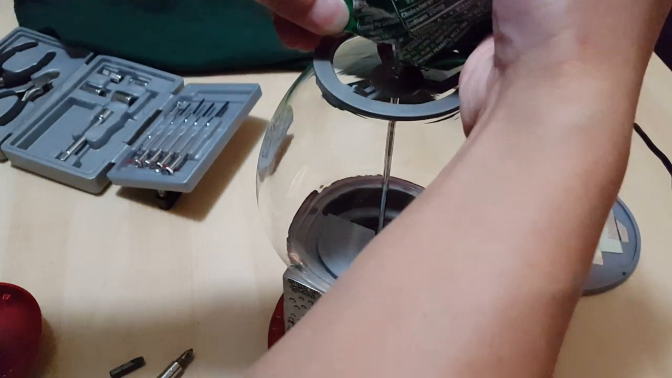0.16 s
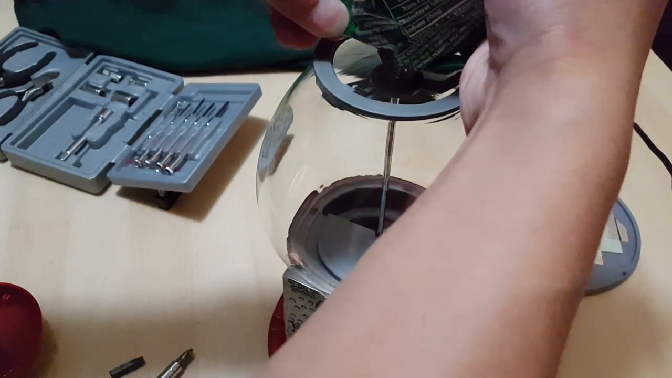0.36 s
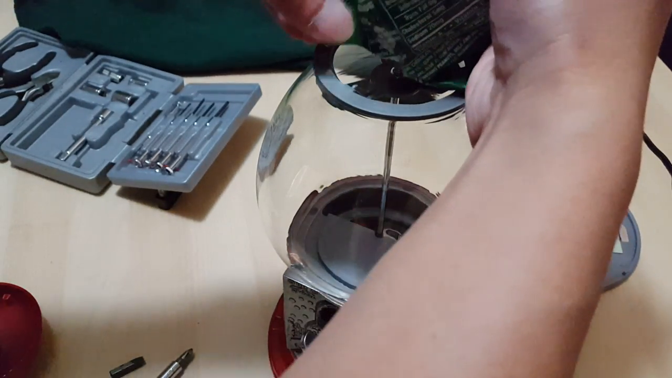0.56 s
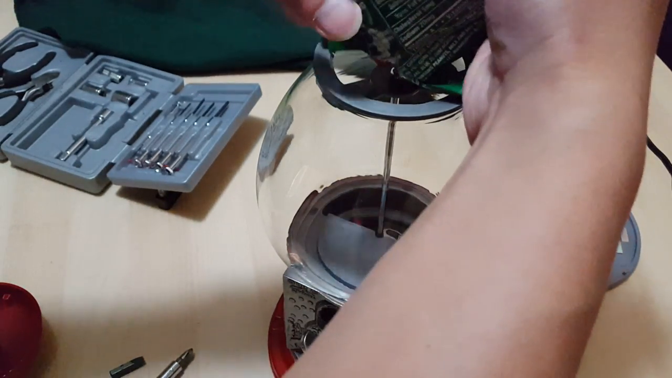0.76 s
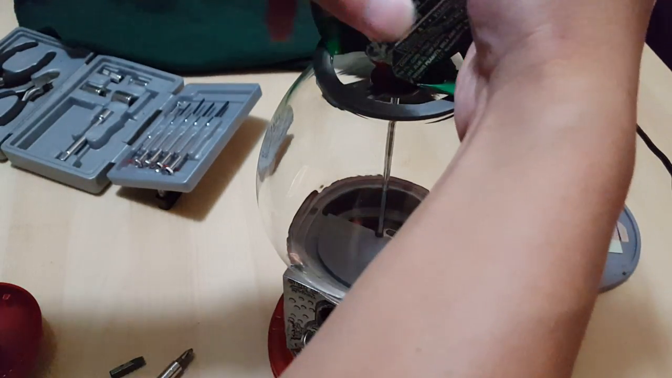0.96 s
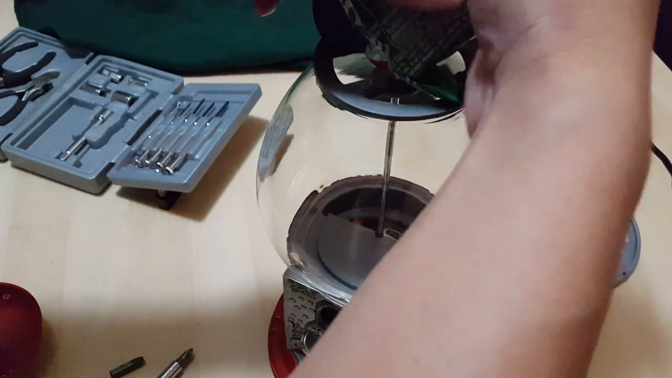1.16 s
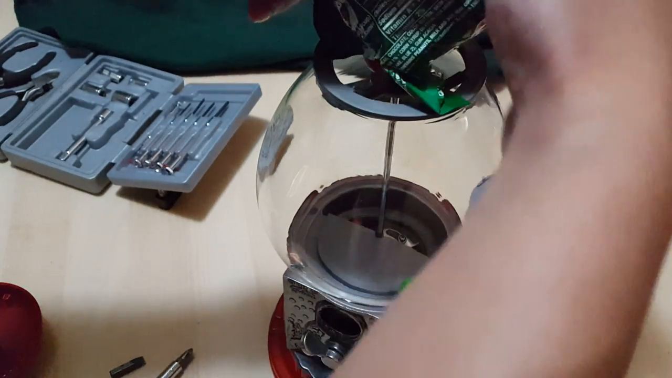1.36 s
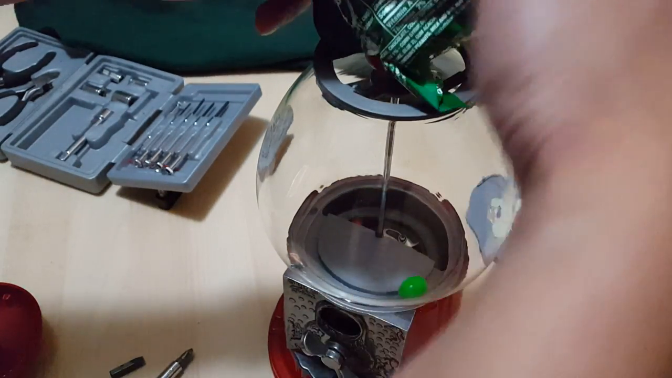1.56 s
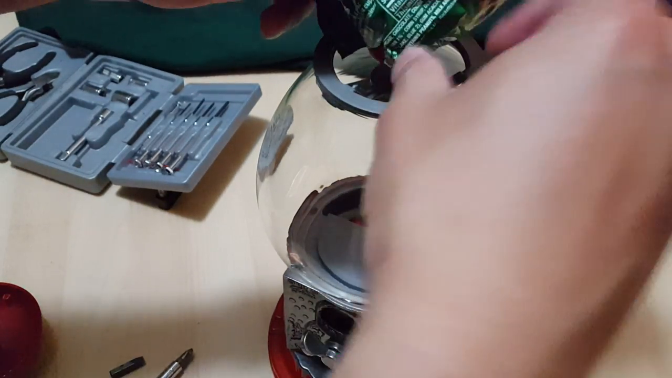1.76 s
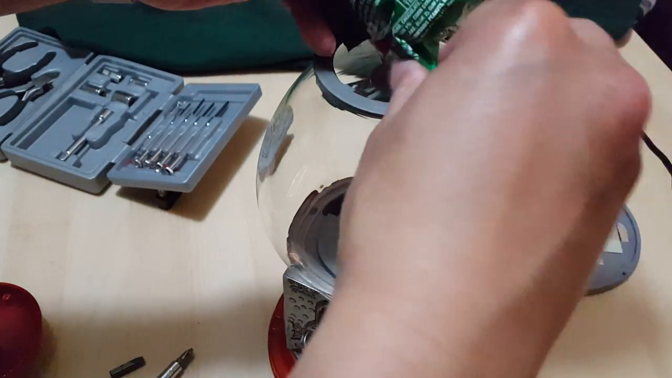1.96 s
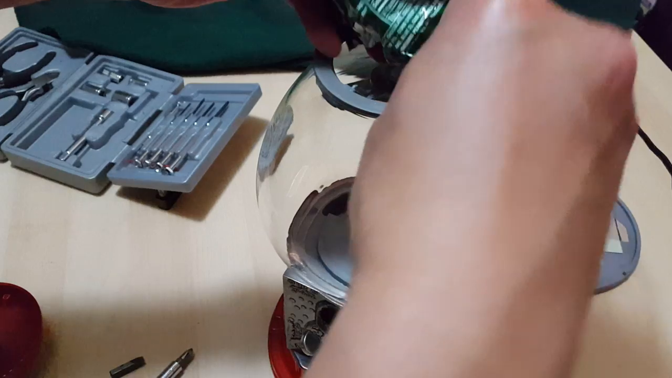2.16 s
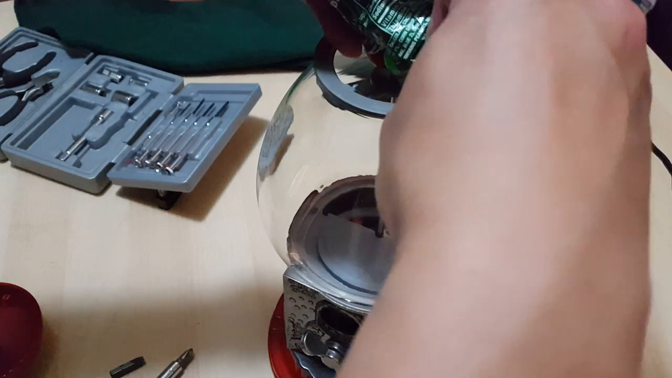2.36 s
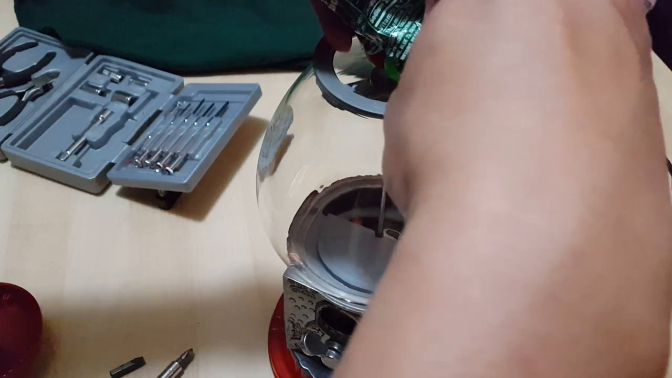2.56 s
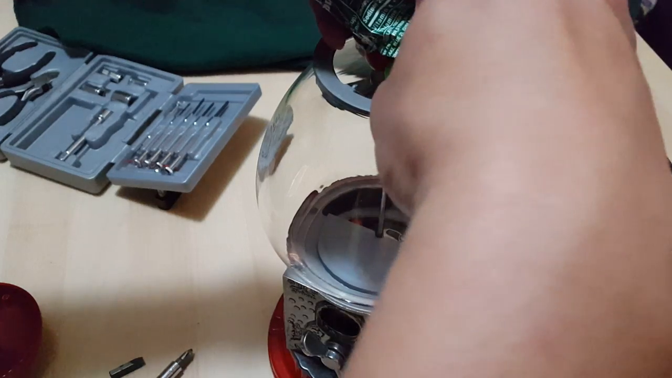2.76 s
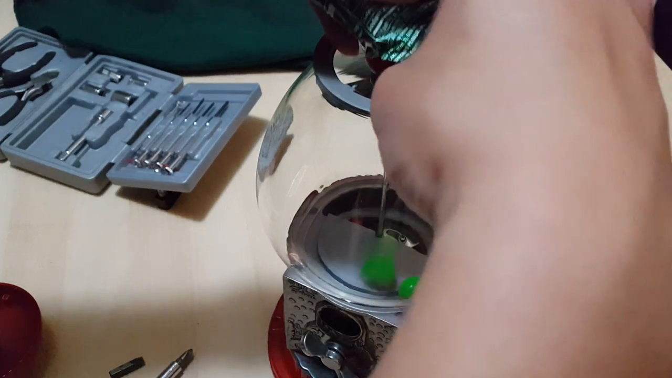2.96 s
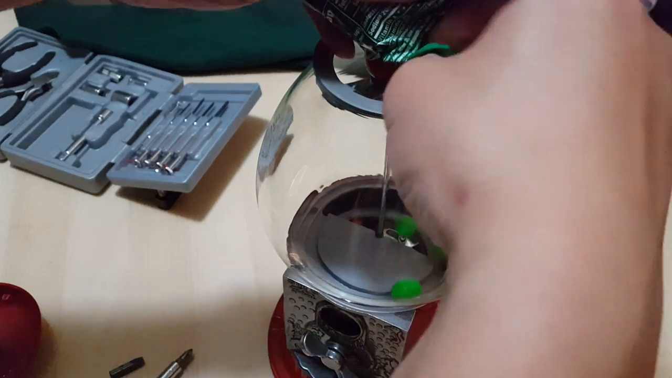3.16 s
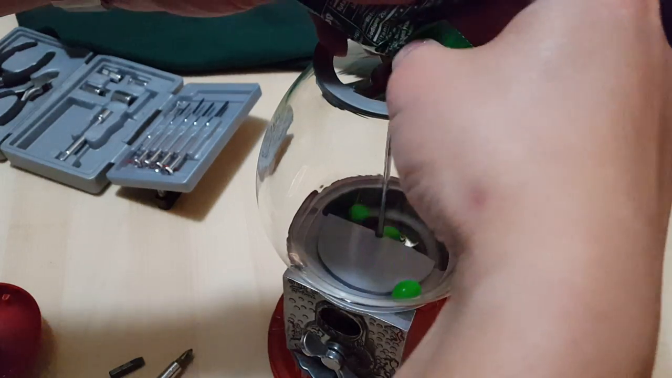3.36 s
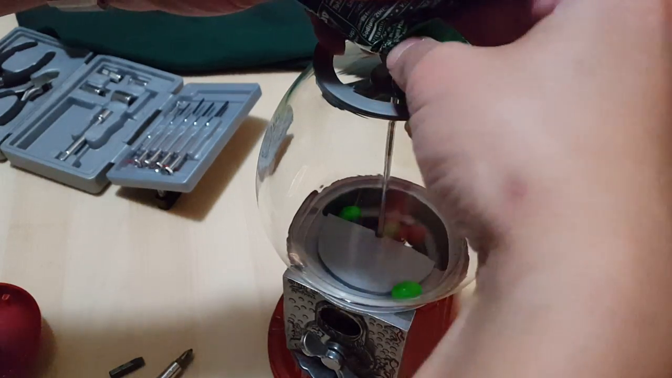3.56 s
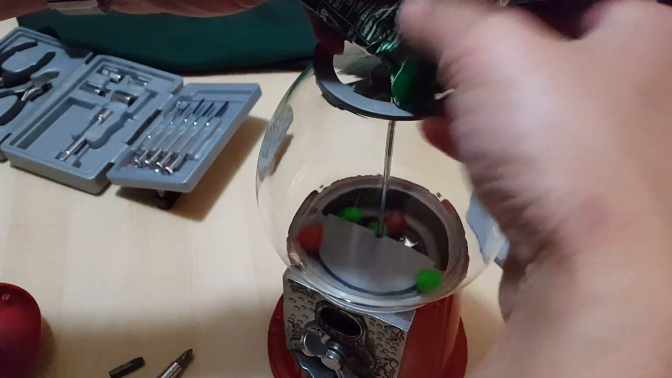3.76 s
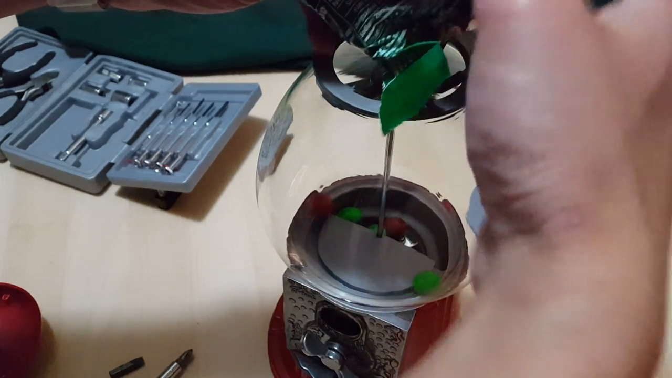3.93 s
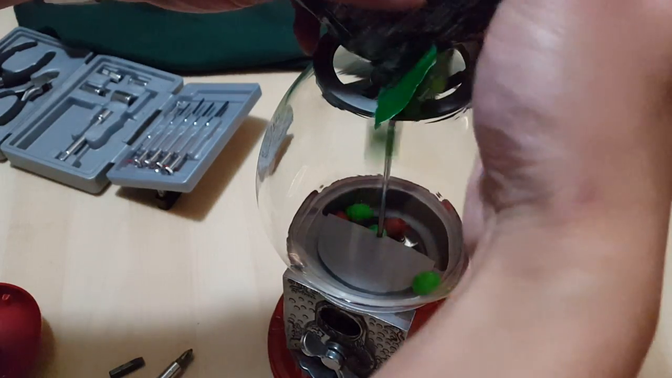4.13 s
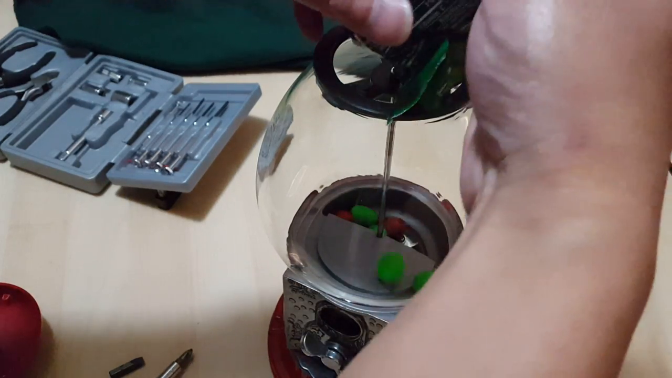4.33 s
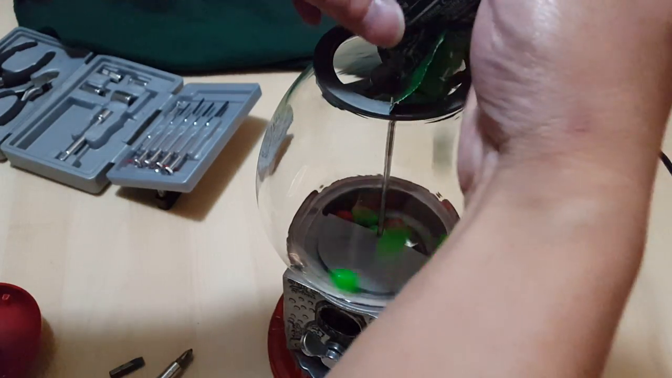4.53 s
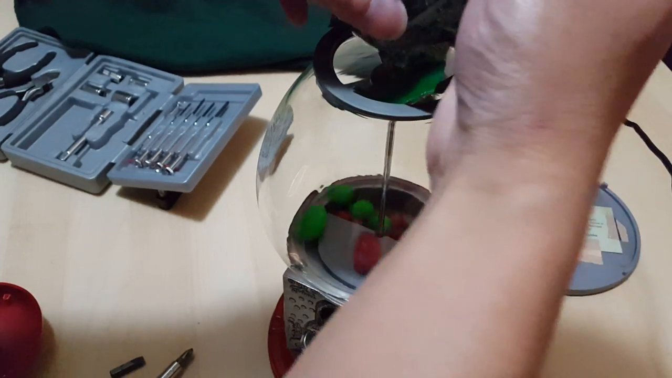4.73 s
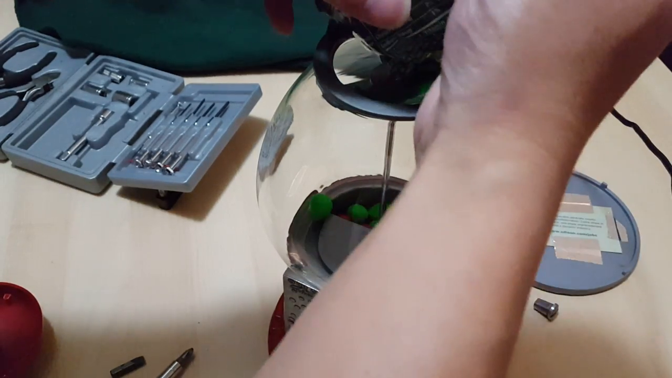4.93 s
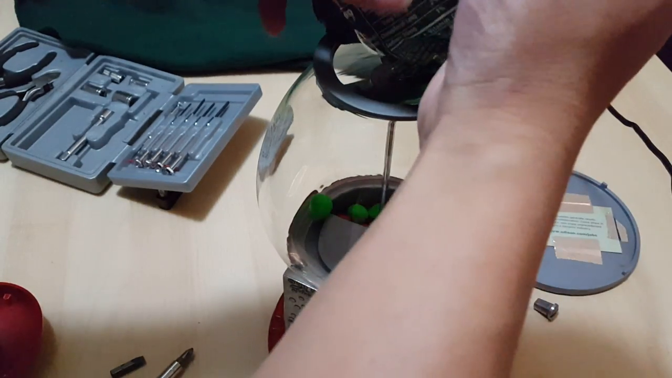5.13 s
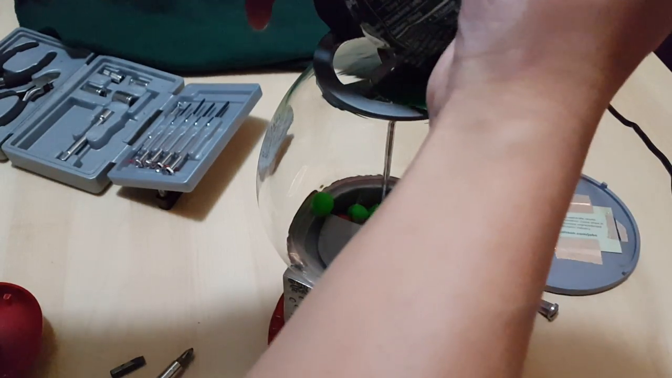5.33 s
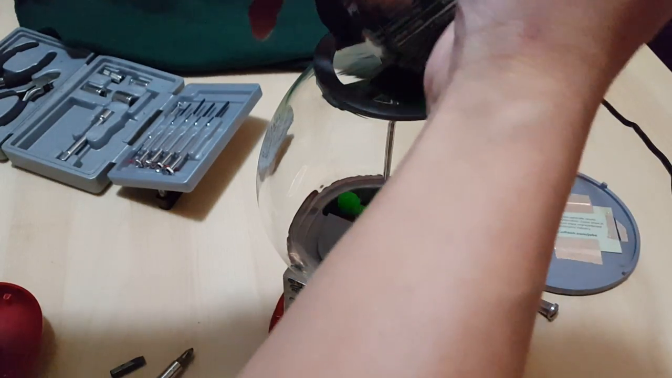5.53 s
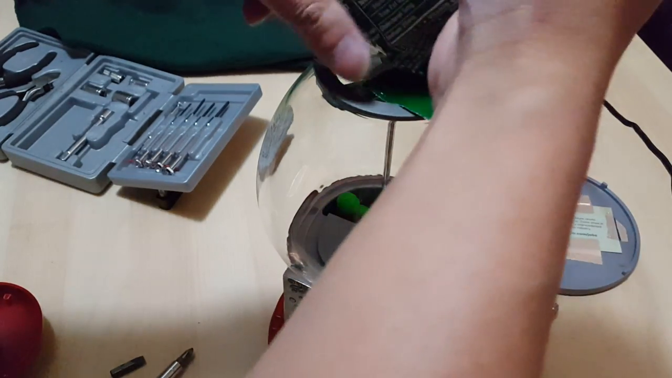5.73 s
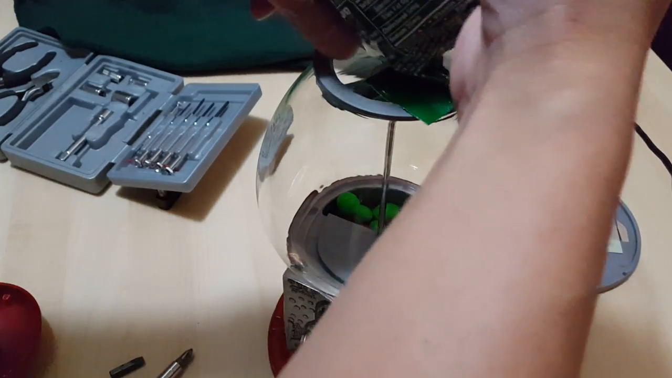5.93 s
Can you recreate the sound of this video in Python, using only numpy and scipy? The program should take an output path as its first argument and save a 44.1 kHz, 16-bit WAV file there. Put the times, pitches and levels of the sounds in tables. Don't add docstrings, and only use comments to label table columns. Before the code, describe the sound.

At a table indoors, heard from very near, thin plastic film rustles and pops in irregular bursts. A handful of hard candies hits a metal base under a hollow glass globe early on; after a long stretch of bag handling, more tumble in, clattering sharply with short glassy rings and tiny rolls. Final crisp crumpling is mixed with low knocks and faint rumble.

```python
import sys
import numpy as np
from scipy import signal
from scipy.fft import next_fast_len
from scipy.io import wavfile
from scipy.ndimage import uniform_filter1d

SR = 44100
rng = np.random.default_rng(int(sys.argv[2]) if len(sys.argv) > 2 else 0)


def natural_amplitude(level_db):
    exponent = np.asarray(level_db, float) / 20
    return 10 ** exponent


def materialize(psi):
    bounded = np.clip(np.atleast_2d(psi).T, -1, 1)
    quanta = np.round(bounded * 32767).astype(np.int16)
    wavfile.write(sys.argv[1], SR, quanta)


N = 268569

SIDES = np.array([[.5], [-.5]])
BANDS_HZ = 36 * 2 ** np.arange(0, 8.9, .5)
UNEVEN_DB, LEAD_SPREAD_RAD = 3, 1.3
SNAP_T60_S = .004


def ring(x, hz, t60):
    pole = np.exp((2j * np.pi * hz - np.log(1000) / t60) / SR)
    if not hz:
        pole = pole.real
    return signal.lfilter([1], [1, -pole], x)


def band(x, hz):
    edges = [hz / 1.19, min(hz * 1.19, 20000)]
    return signal.sosfilt(signal.butter(2, edges, "bandpass", fs=SR, output="sos"), x)


def highpass(x, hz, order):
    return signal.sosfilt(signal.butter(order, hz, "highpass", fs=SR, output="sos"), x)


def spikes(s, size):
    return np.bincount(np.clip((s * SR).astype(int), 0, N - 1), size, N)


def curve(table):
    s, *columns = np.transpose(table)
    return [np.interp(np.arange(N) / SR, s, c) for c in columns]


def treble_pan(hz):
    return natural_amplitude(1.5 * min(hz / 9000, 1) * SIDES)


def ports(hz):
    alike = .92 / (1 + (hz / 710) ** 2)
    noise = rng.standard_normal((2, N))
    echo = .7
    delay = 150 + int(hz) % 200
    mid, side = (noise + echo * np.roll(noise, delay, axis=1)) / np.hypot(1, echo)
    mix = np.sqrt(1 + alike) * mid + np.sqrt(1 - alike) * side * np.array([[1], [-1]])
    bass_pan = natural_amplitude(0.67 / (1 + (hz / 100) ** 2) * SIDES)
    return treble_pan(hz) * bass_pan * mix / np.sqrt(2)


def colour(hz, centre_hz, low_db, high_db, octaves):
    hump = np.exp(-.5 * (np.log2(hz / centre_hz) / octaves) ** 2)
    bass = natural_amplitude(low_db) / (1 + (hz / 600) ** 2) * min(hz / 260, 1) ** 4
    treble = natural_amplitude(high_db) / (1 + (4000 / hz) ** 2 + (hz / 16500) ** 4)
    return hump + bass + treble


def pings(s, size, hz, t60, lead):
    length = 2048
    out, t = np.zeros((2, N + length)), np.arange(length) / SR
    for start, a, f, d, p in zip((s * SR).astype(int), size.T, hz, t60, lead):
        tone = np.exp((2j * np.pi * f - np.log(1000) / d) * t)
        at_ports = a * np.exp([.5j * p, -.5j * p])
        out[:, start:start + length] += np.outer(at_ports, tone).imag
    return out[:, :N]


def touch():
    noise = rng.standard_normal((2, N)) + 1j * rng.standard_normal((2, N))
    return np.tile(ring(noise, 0, .04) / 16, 2)


BAG_SNAPS = [(0.049, -19, 2300, -43), (0.067, -20.5, 1110, -12), (0.091, -22, 2520, -21),
             (0.14, -16, 2890, -6), (0.181, -15.5, 2640, -38), (0.117, -22.5, 2000, 6),
             (0.164, -20, 1420, 0), (0.206, -15, 1280, -13), (0.234, -10.5, 1460, -4.5),
             (0.311, -12, 2240, -17), (0.373, -29, 2240, -5.5), (0.583, -14.5, 1330, -7),
             (0.597, -23, 2750, -14), (0.736, -9.5, 1460, -12.5), (0.864, -23.5, 1720, -25),
             (0.916, -14, 2500, -11.5), (0.974, -22, 900, -7), (0.978, -19.5, 1500, -12),
             (1.026, -9, 1300, -7.5), (1.103, -25.5, 1210, -12), (1.133, -20, 2070, -7),
             (1.189, -14.5, 1330, -11), (1.202, -11.5, 3100, -23), (1.22, -13.5, 2700, -16),
             (1.389, -18, 1800, -8), (1.505, -16.5, 2080, -12), (1.547, -27.5, 1160, 5.5),
             (1.564, -11, 1590, -5.5), (1.637, -15, 2170, -22), (1.702, -26.5, 770, -9),
             (1.751, -28, 1350, -4),
             (1.86, -27.5, 794, -1), (1.86, -35, 1700, -14), (1.893, -20, 1390, -15),
               (1.908, -27.5, 2650, 3.5), (2.006, -28.5, 1280, 1), (2.045, -23.5, 2160, -4),
               (2.084, -32, 4260, 8.5), (2.118, -17.5, 1530, -7.5), (2.129, -10.5, 1170, -10.5),
               (2.161, -19, 1880, -5), (2.297, -11.5, 1360, -18), (2.326, -16.5, 1790, -4.5),
               (2.409, -20, 1570, -13), (2.436, -17, 1570, -27), (2.466, -39.5, 3000, 19.5),
               (2.509, -21, 4430, -1.5), (2.524, -18, 2990, -9), (2.542, -14.5, 1510, -33),
               (2.557, -31.5, 4440, 18), (2.598, -29.5, 4510, 9.5), (2.64, -22.5, 1760, -14),
               (2.683, -16, 3500, -13), (2.765, -24, 1980, 0.5), (2.712, -33.5, 1390, 5.5),
               (2.817, -17, 4330, -3), (2.851, -16, 1890, -30), (2.905, -23.5, 1350, 8),
               (2.913, -14.5, 1650, -13), (2.952, -18.5, 1330, -15), (2.966, -14, 1440, -4),
               (2.989, -14, 2880, -3.5),
             (3.882, -23, 4230, -10), (3.91, -25, 1100, 11.5), (3.931, -23, 1800, 2.5),
             (3.942, -29, 1070, 6), (3.98, -19.5, 584, 1), (4.238, -23, 1570, -16), (4.492, -13, 1600, -3),
             (4.905, -18, 1800, -6), (4.961, -16, 4200, -4), (4.986, -16, 3300, -9),
             (5.065, -16.5, 1570, -4), (5.274, -15, 2900, -1.5), (5.319, -23, 980, 0.5),
             (5.372, -26, 1460, 5.5), (5.426, -24.5, 1500, -6), (5.464, -15.5, 1540, -5.5),
             (5.483, -12, 1630, -12), (5.507, -22, 1990, -8), (5.522, -15, 1540, -11),
             (5.558, -11.5, 1880, -12), (5.62, -25, 1020, -1), (5.64, -14.5, 1700, -6),
             (5.678, -25, 1570, -5), (5.712, -21, 1590, -28), (5.755, -18, 1120, -20),
             (5.81, -21.5, 1580, -12), (5.883, -27, 1500, -20), (5.946, -16.5, 1630, -12),
             (5.993, -19.5, 1620, -4.5), (6.051, -19, 1760, -5.5)]
MORE_BAG_SNAPS = [(0.07, -26, 2410, -0.5), (0.108, -17.5, 970, -10), (0.153, -25, 1360, -12),
                    (0.251, -25, 1430, -11), (0.794, -26, 1550, -32), (1.042, -24, 1250, -22),
                    (1.053, -26.5, 6200, -8), (1.075, -28, 1510, -20), (1.141, -26, 1420, 0.5),
                    (1.154, -21, 2000, -18), (1.167, -25, 1620, -12), (1.246, -23, 1520, -26),
                    (1.254, -30, 1550, -27), (1.264, -21, 965, -30), (1.267, -27, 1510, -34),
                    (1.294, -16.5, 1650, -34), (1.307, -18, 1400, -14), (1.314, -17, 2010, -19),
                    (1.334, -32, 1380, -13), (1.344, -22, 710, -3.5), (1.358, -29, 1700, -12),
                    (1.382, -19.5, 1570, -28), (1.403, -27, 1380, -17), (1.411, -29, 1360, -14),
                    (1.433, -18, 1920, -19), (1.447, -29, 1270, -18), (1.454, -19.5, 1100, -14),
                    (1.614, -28, 1530, -8),
                    (2.577, -27, 6370, -10), (2.652, -21, 1400, -8), (2.803, -21.5, 1420, -9),
                    (2.821, -16.5, 2920, -4), (2.858, -12.5, 3250, -24), (2.876, -19, 1400, -25),
                    (2.886, -29, 3210, -17), (2.978, -18.5, 1360, -17), (3.009, -32, 3230, -11),
                    (3.791, -26, 1300, 0), (3.802, -13, 1720, -15), (3.834, -29, 5470, 8.5),
                    (3.854, -27, 1270, 5), (3.876, -23, 5210, -1), (3.896, -18, 1590, -2),
                    (3.956, -19, 1700, -20), (3.971, -17, 1310, -25), (4.242, -25, 1890, -23),
                    (4.251, -21, 1570, -8), (4.892, -21.5, 4410, -3.5), (4.979, -10.5, 1640, -11),
                    (5.239, -38, 2800, -10), (5.017, -35, 1640, -2), (5.027, -22, 1500, -1),
                    (5.071, -24, 1270, -3), (5.081, -17, 2670, -17), (5.123, -26, 2690, -1),
                    (5.174, -28, 3700, -29), (5.204, -17.5, 1490, -14), (5.218, -27, 1640, -13),
                    (5.279, -19, 2390, -6), (5.288, -18, 1120, -12), (5.333, -21, 2600, -9),
                    (5.472, -33, 990, -7), (0.271, -29, 1200, -4.5), (5.515, -24, 1920, 3),
                    (5.53, -23, 1720, -17), (5.534, -15, 1470, -5), (5.563, -36, 1110, -6),
                    (5.571, -37, 1060, -15), (5.575, -33, 1420, -3), (5.592, -18.5, 4460, -7),
                    (5.634, -19, 1740, -21), (5.656, -12, 3130, -21), (5.941, -18, 2000, -25),
                    (5.956, -22, 1360, -3.5),
                    (0.002, -22, 2420, -12), (0.019, -28, 3190, -18), (0.308, -20, 2260, -17),
                  (0.822, -36, 1360, 0), (2.342, -33, 1210, -4), (2.395, -26.5, 1480, 0.5),
                  (2.455, -27.5, 1900, -1), (2.553, -29, 4410, -2), (2.826, -22, 1340, -5),
                  (4.138, -25, 1460, -5), (5.447, -22, 1050, -9), (5.724, -25, 1040, -11)]


def snaps():
    listed = BAG_SNAPS
    return np.transpose(listed + MORE_BAG_SNAPS)


def crinkle(hz, folds):
    s, db, pitch_hz, treble_db = folds
    size = natural_amplitude(db - 4.5 + UNEVEN_DB * rng.standard_normal(len(s)))
    blows = spikes(s, size * colour(hz, pitch_hz, -13.0, treble_db + 5.5, 0.49))
    shiver_db = -19 - 1.56 * min(hz / 6000, 1)
    shiver = ring(blows, 0, 0.14 * (1500 / hz) ** 0.0056).real
    return ring(blows, 0, SNAP_T60_S).real + natural_amplitude(shiver_db) * shiver


def bag_tones(folds):
    s, db, pitch_hz, _ = folds
    pan, lead = rng.standard_normal((len(s), 2)).T
    size = natural_amplitude(db - 3.0 + SIDES * (4.5 + 2 * pan))
    return pings(s, size, pitch_hz, 4.0 / pitch_hz, LEAD_SPREAD_RAD * lead * pitch_hz / 1500)


# time in seconds, rustle level in dB, level of candies knocking inside in dB.
HANDLING = [(.15, -52, -73), (.38, -60, -61), (.75, -42, -43), (.9, -50, -31.5), (1.1, -39, -26),
            (1.5, -41, -33.5), (1.77, -57, -53), (2.0, -44.5, -37.5), (2.26, -51, -48), (2.55, -49, -100),
            (2.78, -52, -29), (2.84, -42, -36), (3.5, -53, -102), (3.92, -38.5, -21.5), (4.95, -38, -40),
            (5.38, -50, -34), (5.55, -30.5, -20.5), (5.9, -52, -38)]


def rustle(hz, tiny_folds):
    mid_db, low_db = curve(HANDLING)
    high_db = mid_db - 6.5 + .5 * (mid_db + 44.5)
    place = np.log2(hz)
    low = np.clip(np.log2(900) - place, 0, 1)
    high = np.clip(place - np.log2(3200), 0, 1)
    db = mid_db + low * (low_db - 18.0 - mid_db) + high * (high_db - 3.5 - mid_db)
    s, weight = tiny_folds
    sizes = natural_amplitude(2.3 * weight + 4 * rng.standard_normal(len(s)))
    crackle = ring(spikes(s, sizes), 0, SNAP_T60_S).real
    rubbing = natural_amplitude(-17)
    return natural_amplitude(db - 8.5) * min(hz / 200, 1) ** 3 * (rubbing + natural_amplitude(4.0) * crackle)


# pitch in Hz, level in dB per Hz.
ROOM_TONE = [(15, -34), (25, -33), (181, 1), (427, 20.5), (515, -23), (1860, -21), (3830, -13), (10000, -2),
             (15000, -50)]


def room(hz):
    f, db = np.transpose(ROOM_TONE)
    return natural_amplitude(-53.5 - 43.5 + np.interp(np.log(hz), np.log(f), db))


# time in seconds, hum level in dB, rumble level in dB.
TABLE_SHAKE = [
    (0, -68, -64),
    (2, -59.5, -35),
    (4, -52, -43),
    (4.3, -62.5, -68),
    (5.6, -56.5, -40),
    (5.8, -63, -30),
    (6.09, -55, -27),
]


def table():
    hum_db, rumble_db = curve(TABLE_SHAKE)
    hum = ring(ports(119), 104.0, 0.24) / 22
    rumble = signal.hilbert(band(ports(60), 51.0), next_fast_len(N))[:, :N]
    shake = natural_amplitude(hum_db + 2.5) * hum + natural_amplitude(rumble_db + 2.5) * rumble
    return (shake * natural_amplitude(3 * SIDES) * np.exp(-.9j * SIDES)).imag


# start in seconds, peak level in dB, strongest tone in Hz, treble in dB, glass ring in dB.
GLASS_HITS = [(0.415, -13.5, 3470, 4.5, -9), (3.123, -31, 7040, 23, 7), (3.156, -7.5, 1620, 2.5, -12.5),
              (3.401, -27.5, 3860, 20, -9), (3.506, -3, 2365, -3, -16.5), (3.639, -12.5, 3280, 5, -32),
              (3.732, -12.5, 1790, 0, -13), (4.113, -21, 1280, -3, -28), (4.276, -16, 3500, 10, -3),
              (4.513, -11.5, 1290, 6, -16), (4.527, -18, 3620, 5, 2), (4.613, -2.5, 6780, -10.5, -16),
              (4.637, -29, 3460, -7, 13), (4.668, -15, 1530, 4, -14), (4.732, -20.5, 3680, 14.5, -3.5),
              (4.756, -12.5, 2960, 3, -26), (4.879, -26, 4220, -1, -29), (5.158, -21, 3680, -1, -10.5)]
# start in seconds, peak level in dB, strongest tone in Hz, thud in dB.
BOUNCES = [(.416, -19.5, 1440, -21), (0.467, -22, 1540, -12), (.479, -15.5, 2740, -15),
           (0.458, -22, 4500, -21), (3.047, -16.5, 1095, -12), (3.094, -26, 1710, -27),
           (4.516, -17, 6900, -40), (3.163, -10.5, 3470, -29), (3.172, -12.5, 1150, -17),
           (3.188, -21, 2050, -13), (3.192, -21, 5060, -32), (3.199, -26, 1100, -34),
           (3.232, -25, 1100, -18), (3.323, -19, 2850, -20), (3.382, -24, 1580, -14),
           (3.512, -10.5, 3320, -17), (3.532, -24, 1130, -8.5), (3.6, -44, 1780, -23),
           (3.705, -23.5, 1400, -6), (3.672, -17.5, 1060, -18.5), (4.064, -20.5, 1220, -25),
           (4.102, -27.5, 4330, -18), (4.137, -27, 1340, -22), (4.184, -18.5, 1860, -28),
           (4.19, -40, 1560, -31), (4.277, -11.5, 1570, -48), (4.303, -34, 4500, -21),
           (4.318, -11, 2740, -32), (4.343, -30, 8040, -13), (4.351, -49, 1480, -29),
           (4.37, -40, 1080, -28), (4.394, -35, 1460, -31), (4.417, -21, 4030, -42),
           (4.448, -23, 1460, -28), (4.481, -25, 1420, -29), (4.577, -20, 2140, -4.5),
           (4.598, -26, 3640, -28), (4.68, -23, 1720, -27), (4.71, -23, 1830, -4.5),
           (4.742, -19.5, 4600, -14), (4.77, -17, 3000, -11), (4.805, -37, 1520, -29)]
# start in seconds, peak level in dB, strongest tone in Hz, thud in dB, treble in dB.
BASE_HITS = [(0.456, -10, 2880, -17.5, 1.5), (0.492, -16.5, 2070, -5, -6), (0.607, -13.5, 2790, -53, 5.5),
             (0.655, -26, 3570, -2.5, 8), (0.709, -22, 2910, -60, -7), (3.034, -5, 2060, -16, -3),
             (3.209, -17.5, 1090, -39, 5), (3.275, -11.5, 1840, -20, -0.5), (3.298, -14.5, 1890, -19, -5),
             (3.314, -12, 2930, -45, 2.5), (3.355, -12.5, 2040, -44, -13), (3.426, -21, 2050, -13.5, -29),
             (3.585, -21, 1270, -39, -34), (3.665, -7, 2060, -13, -12), (4.06, -21, 1280, -40, -3),
             (4.075, -21, 2100, -7, 0.5), (4.161, -20.5, 2000, -39, -9), (4.289, -9, 2190, -19, -21),
             (4.315, -20, 4550, -3, 11.5), (4.341, -16.5, 1470, -37, -30), (4.408, -22.5, 1640, -53, -2),
             (4.569, -10, 2090, -18, -3.5), (4.787, -25.5, 2330, -22, 10), (4.833, -29.5, 1870, -9, 8.5)]
BASE_RING_DB = -62


def hits():
    glass_thud_db, bounce_treble_db = -17.5, -9.5
    on_base = [(*hit, BASE_RING_DB) for hit in BASE_HITS]
    on_glass = [(s, db, hz, glass_thud_db, *top) for s, db, hz, *top in GLASS_HITS]
    rebounds = [(*hit, bounce_treble_db, BASE_RING_DB) for hit in BOUNCES]
    return np.transpose(on_base + on_glass + rebounds)


def crack(hz):
    s, db, tone_hz, thud_db, treble_db, glass_db = hits()
    gap_db = -6.0 * np.exp(-.5 * (np.log2(hz / 680) / 0.37) ** 2)
    uneven_db = UNEVEN_DB * rng.standard_normal(len(s))
    clear_db = 3 * (glass_db > BASE_RING_DB)
    size = natural_amplitude(db - 8.5 + gap_db + uneven_db - clear_db)
    blows = spikes(s, size * colour(hz, tone_hz, thud_db + 5.0, treble_db + 2.5, 0.75))
    contact_s = .0016
    blows = uniform_filter1d(blows, int(contact_s * SR), origin=-int(contact_s * SR / 2))
    echo = ring(blows, 0, 0.24 * (1500 / hz) ** 0.075).real
    return ring(blows, 0, 0.0097).real + natural_amplitude(-11.0) * echo


def noises(snapped):
    tiny_folds = rng.random(4000) * N / SR, rng.exponential(size=4000)
    out = 0
    for hz in BANDS_HZ:
        events = crack(hz) + crinkle(hz, snapped) + rustle(hz, tiny_folds)
        events = events * np.sqrt(SR / (2 * hz))
        out = out + band(ports(hz) * np.hypot(events, room(hz) * 100), hz)
    return out


# pitch in Hz, time in seconds to fade by 60 dB.
GLOBE_MODES = [(220, .12), (283, .1), (445, .11), (1083, .09), (1466, .14), (1540, .1), (1860, .1),
               (2296, .07), (2850, .08), (3472, .22), (3683, .28), (3744, .18), (3558, .17), (4606, .15),
               (8530, .09), (10610, .08), (6596, .09), (6749, .07), (14478, .1)]
GLOBE_DB = [-7, -5, 0, 1, -3, -6, -4, -3, -2, -3, 0, -7, -6, -7, -15, -16, -8, -6, -21]
GLASS_HZ = (3472, 3558, 3683, 3744, 4606, 8530, 10610, 6596, 6749, 14478)


def globe():
    s, db, tone_hz, thud_db, treble_db, glass_db = hits()
    spot = rng.standard_normal((len(s), len(GLOBE_MODES)))
    bumps = rolling() * 2.53 * (rng.random(N) < .0018) * rng.standard_normal(N)
    flutter = touch()
    note = natural_amplitude(db + np.where(glass_db > BASE_RING_DB, -7, -3))
    lead = LEAD_SPREAD_RAD * spot[:, 0] * tone_hz / 1500
    out = pings(s, np.array([note, note]), tone_hz, np.full(len(s), 0.039), lead)
    place = natural_amplitude(1.8 * SIDES) * np.exp(-0.15j * SIDES)
    for k, ((hz, t60), mode_db) in enumerate(zip(GLOBE_MODES, GLOBE_DB)):
        if hz in GLASS_HZ:
            share = natural_amplitude(glass_db + 2.0 * spot[:, k] + (treble_db + 9.5) * (hz > 6000) / 2)
            smear = 0.5
        else:
            share = natural_amplitude(-14.5 + UNEVEN_DB * spot[:, k]) * colour(hz, tone_hz, thud_db + 17.0, -11, 0.75)
            smear = min(hz / 3000, .48)
        blows = spikes(s, natural_amplitude(db) * share) + bumps / (1 + (hz / 1400) ** 2)
        tone = natural_amplitude(mode_db) * place * ring(blows, hz, t60)
        start = N - 9000 * k
        out = out + (tone * (1 - .6 * smear + smear * flutter[:, start:start + N])).imag
    return highpass(out, 190, 3)


def clatter():
    s, db, tone_hz, _, treble_db, _ = hits()
    modes = 30
    spot, flutter = rng.standard_normal((len(s), modes)), touch()
    out = 0
    for k, (place, life) in enumerate(rng.random((modes, 2))):
        hz = 1200 * 12.5 ** ((k + place) / modes) ** .75
        size = natural_amplitude(db - 28 + 3.5 * spot[:, k]) * colour(hz, tone_hz, -38, treble_db + 9.5, 0.19)
        t60 = (0.07 + 0.08 * life) * min(6000 / hz, 1)
        tone = ring(spikes(s, size), hz, t60)
        start = N - 7000 * k
        out = out + treble_pan(hz) * (tone * flutter[:, start:start + N]).imag
    return out


# start in seconds, length in seconds, level in dB.
ROLLS = [
    (0.457, 0.25, -45),
    (3.03, 0.36, -43),
    (3.553, 0.36, -47),
    (4.108, 0.052, -40),
    (4.29, 0.12, -38),
    (4.514, 0.065, -45),
    (4.65, 0.24, -44),
]


def rolling():
    attack_s, release_s, sag_db_per_s = 0.03, 0.1, -6.5
    out = 0
    for s, length, db in ROLLS:
        t = np.arange(N) / SR - s
        gate = np.clip(t / attack_s + 1, 0, 1) * np.clip(1 - (t - length) / release_s, 0, 1)
        out = out + gate ** 2 * natural_amplitude(db - sag_db_per_s * np.clip(t, 0, 1))
    return out


# start in seconds, level in dB, pitch in Hz, time in seconds to fade by 60 dB.
THUMPS = [
    (0.942, -25.5, 453, 0.033),
    (0.978, -20, 310, 0.079),
    (1.026, -14, 432, 0.033),
    (1.753, -40, 423, 0.065),
    (1.919, -34, 300, 0.055),
    (2.135, -8.5, 970, 0.01),
    (4.614, -13, 131, 0.023),
    (5.523, -21, 320, 0.11),
    (5.562, -27, 428, 0.17),
    (5.64, -21, 400, 0.045),
]


def thumps():
    out = 0
    for s, db, hz, t60 in THUMPS:
        push = uniform_filter1d(spikes(np.array([s]), np.ones(1)), int(SR / hz / 2))
        knock = highpass(ring(push, hz, t60).imag, hz * .6, 2)
        out = out + natural_amplitude(db + 10 * SIDES / (1 + (hz / 150) ** 2)) * knock
    return out


def scene():
    folds = snaps()
    return noises(folds) + bag_tones(folds) + table() + globe() + clatter() + thumps()


def top_cut(x):
    return signal.sosfilt(signal.butter(12, 16810, fs=SR, output="sos"), x)


def record(dry):
    x = highpass(dry, 42, 3)
    x = np.tanh(0.77 * x) / 0.87
    x = signal.sosfilt(signal.ellip(8, .2, 70, 15550, fs=SR, output="sos"), x)
    return top_cut(x)


dry = scene()
out = record(dry)
materialize(out)
```